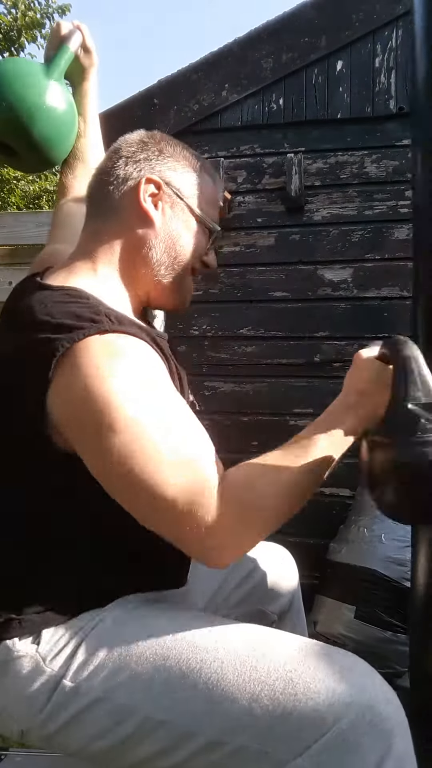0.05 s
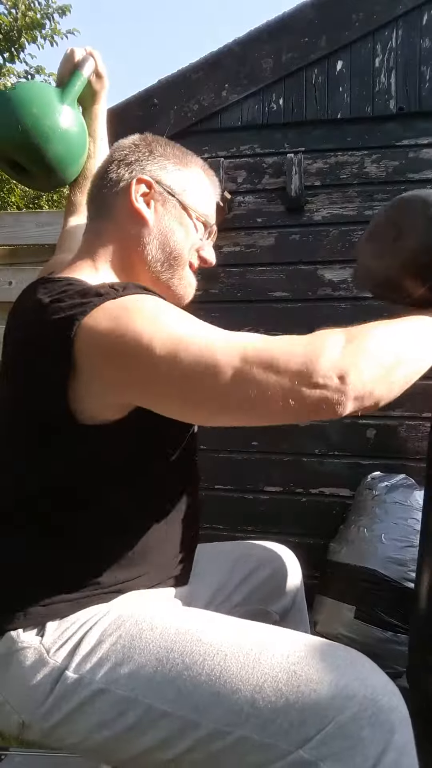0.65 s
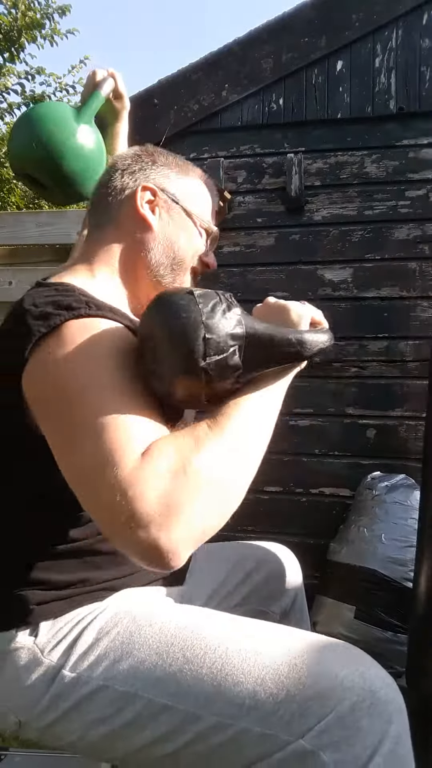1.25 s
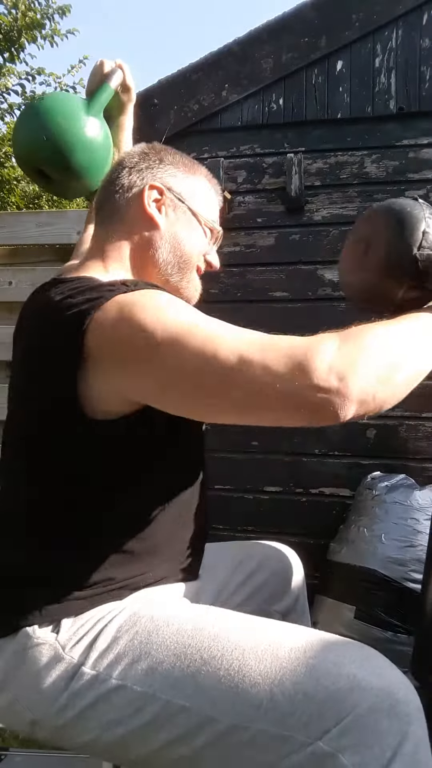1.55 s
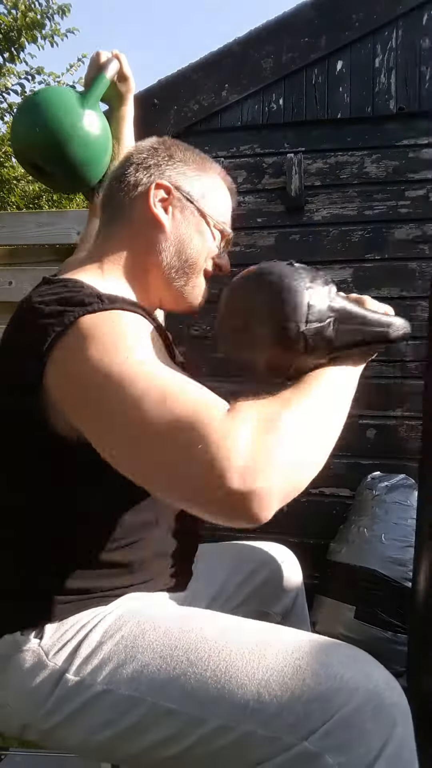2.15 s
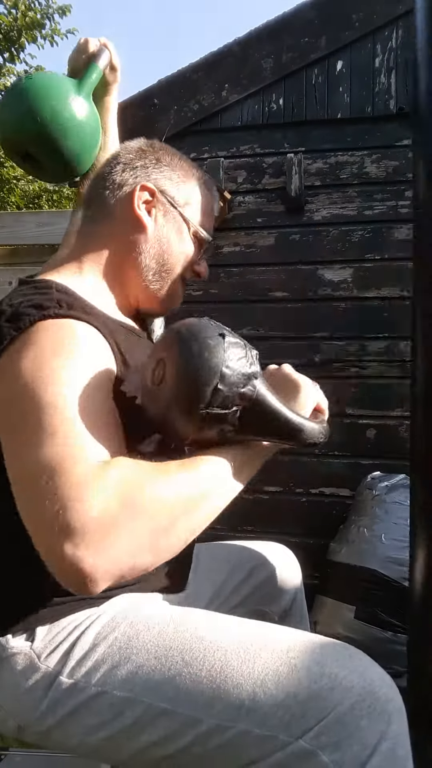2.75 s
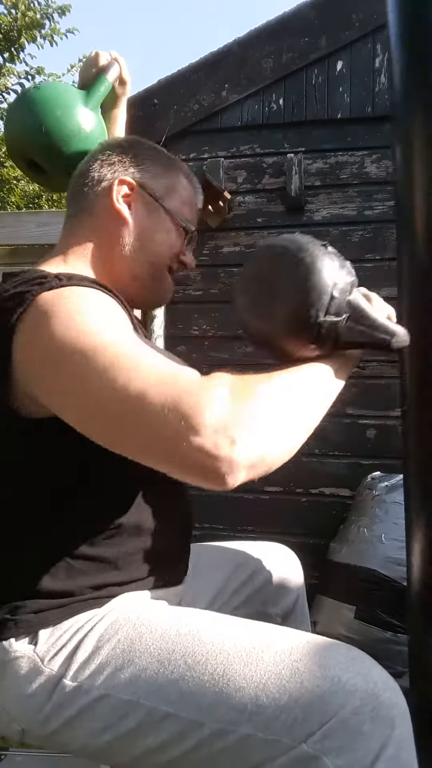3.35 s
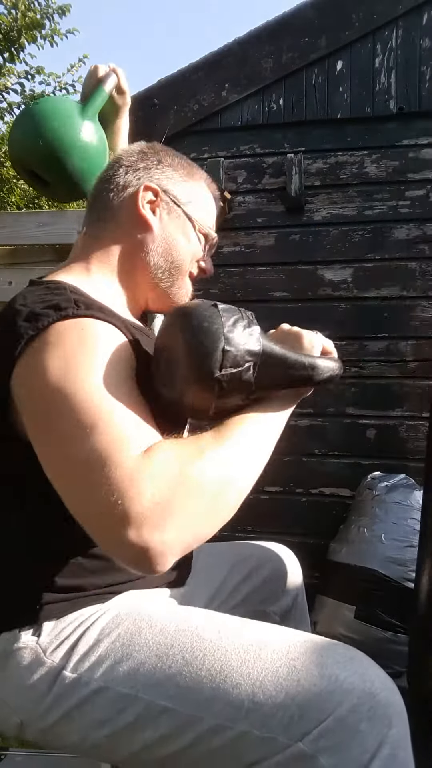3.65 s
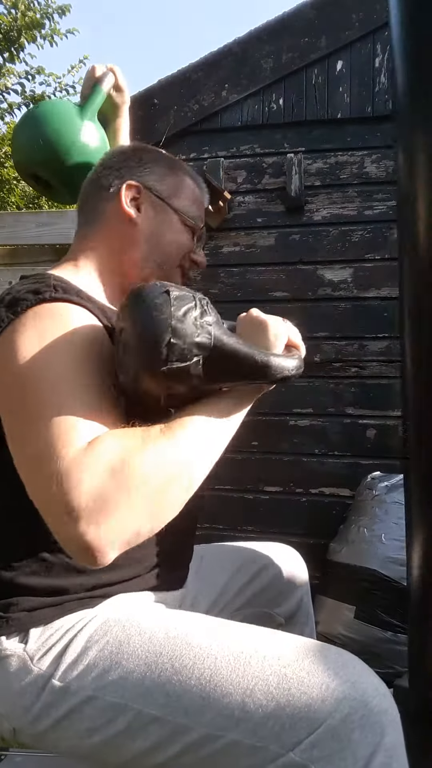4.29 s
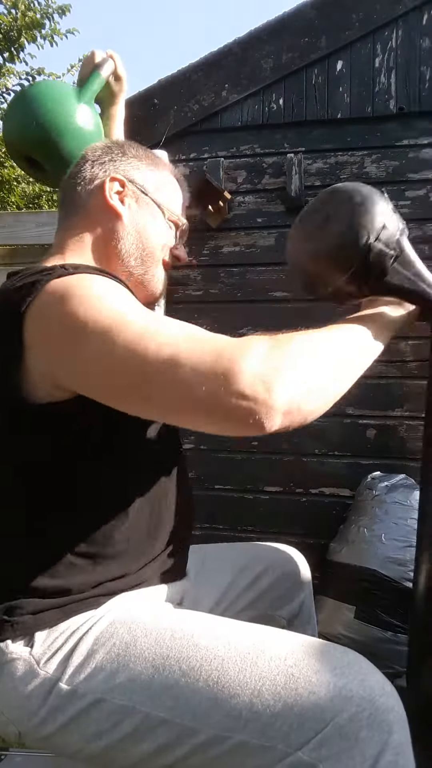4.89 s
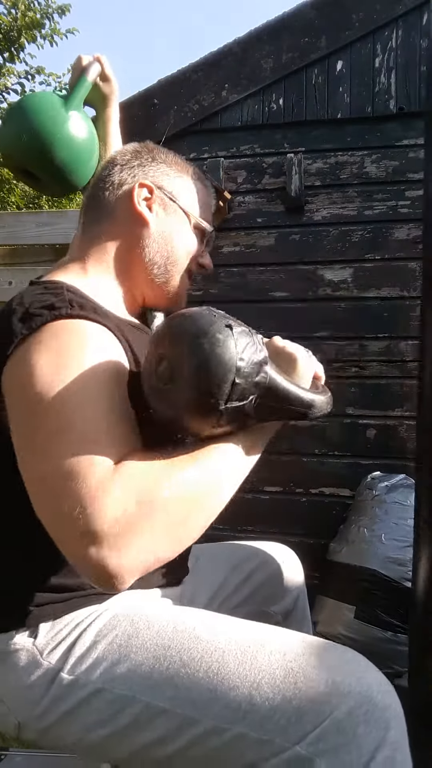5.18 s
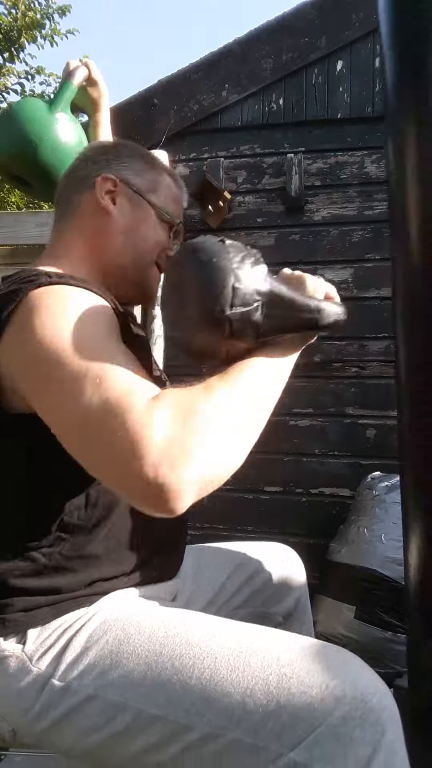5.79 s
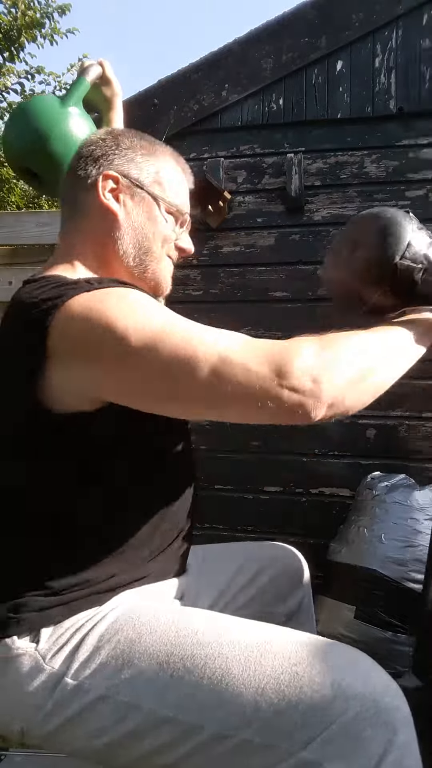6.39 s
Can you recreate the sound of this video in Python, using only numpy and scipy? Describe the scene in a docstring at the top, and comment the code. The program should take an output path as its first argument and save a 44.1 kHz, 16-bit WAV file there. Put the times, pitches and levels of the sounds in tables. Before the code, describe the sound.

Outdoors, steady padded punches on a hanging bag set its mount thudding and rumbling in pairs of deep, woody knocks.

```python
"""Outdoors beside a wooden shed, someone punches a hanging bag with a kettlebell in the fist.
Each punch lands with a soft slap and drives the bag out until its mount thuds; the bag swings back,
thuds again and bounces. A thud is a crack, ringing modes, a chattering joint and shuddering wood.
The mount rumbles as it sways, the cover rubs and creases, and the filling trickles.
Behind it all lies a quiet garden with a few far birds and a faint electrical tick."""
import sys
import numpy as np
from scipy import signal
from scipy.fft import rfft, irfft, next_fast_len
from scipy.io import wavfile
from scipy.ndimage import map_coordinates

SR = 44100
rng = np.random.default_rng(int(sys.argv[2]) if len(sys.argv) > 2 else 0)


def store_pcm(level_fs):
    """Save levels as 16-bit WAV."""
    pcm = np.round(np.clip(level_fs, -1, 1) * 32767).astype(np.int16)
    wavfile.write(sys.argv[1], SR, np.atleast_2d(pcm).T)


N = 287973

# Cue sheets; each layer adds its own trim to these levels.
# The bag ends its outward swing, or falls back: t/s, thump/dB, boom/dB, knock/dB, crack/dB, sway/dB,
# rustle/dB
PUSHES = [(0.7473, 0, -4.5, -5.2, -59.5, -5, -2), (1.6024, 0.4, -3, 0, -35, -1, 0),
          (2.425, 3, 1, 1.5, -27.5, 1.5, 2), (3.213, 3.5, 3, 2, -29, 1.5, 3.5),
          (3.9953, -1, 5, -5.5, -31, -6.5, -1), (4.8187, -2, -2.5, -4, -35, -3.5, -1),
          (5.6092, 4.5, 1.5, 0.5, -41, -1, -2), (6.4336, -1, -1.5, 2, -37.5, -1.5, 0.5)]
RETURNS = [(0.0794, -1.2, 0.8, 0.5, -28, -4, -4.5), (0.915, -4, 10, -2.3, -26, 1.5, -0.5),
           (1.781, 0.5, 9, 1.5, -29, 7, -0.5), (2.581, -2, 7.5, 1.5, -25, 5.5, 0.5),
           (3.359, 1.5, 1, 1.5, -26.5, 3, 1), (4.144, 1.5, -3.5, -1, -33, -5.5, 0.5),
           (4.9849, -0.9, 8.5, 1, -27, 2.5, 0), (5.739, -2.3, -6, -1.5, -39, -5.5, -1)]
# the mount bounces after a return: t/s, thump/dB, boom/dB, knock/dB, crack/dB
BOUNCES = [(.120, -6.5, -20, -32, -51), (.135, -7, -24, -33, -57), (.972, -7, 1, -2, -43),
           (1.842, 2.5, -1, -5.5, -56), (1.99, -9, -17, -32, -57), (2.644, -3, 0, -4, -39),
           (2.782, -10, -20.5, -23, -58), (3.418, -23, -3.5, -6.5, -54), (4.197, -10, -20, -11, -49.5),
           (4.305, -14, -20.5, -22, -53), (5.048, -3.5, 1.5, -2, -36), (5.788, -8, -35, -32, -52.5)]
# the push that has the bag already swinging as the scene opens: t/s, sway/dB
OPENING_PUSH = (-0.087, 1)
# far bird whistles: t/s, length/s, f/Hz, level/dB
BIRDS = [(3.79, 0.18, 1880, -61), (4.36, 0.14, 5170, -72), (4.59, .06, 5180, -79), (4.68, .07, 5130, -80)]
# the sharpest creases in the cover: t/s, level/dB, fizz/dB
CREASES = [(0.02, -42, -65), (0.05, -45, -63), (0.4228, -52.5, -54), (1.2541, -44.5, -81.5),
           (1.497, -45.5, -67.5), (1.9027, -52, -50.5), (2.6604, -40, -42), (3.1682, -40, -46.5),
           (3.3553, -38.5, -44), (3.5447, -43, -65), (3.5862, -41, -72), (3.6375, -42.5, -62),
           (3.7252, -43, -56), (4.2425, -38.5, -57), (5.8649, -37.5, -57.5)]
# the hanger scuffs as it takes up its slack before a punch, or on a backswing: t/s, level/dB
SCUFFS = [(0.601, -35), (1.383, -33.5), (1.427, -31.5), (2.285, -28.5), (3.087, -31), (3.875, -31.5),
          (4.67, -33), (5.425, -36), (5.495, -32), (6.005, -35.5), (6.197, -43.5), (6.266, -33.5)]
# the fist meets the bag: t/s, level/dB, snap/dB, follow-through/dB relative to the level
SLAPS = [(0.654, -30, -59.5, -3.5), (1.508, -28.5, -58, 1), (2.325, -26.5, -47.5, -0.5),
         (3.115, -19.5, -47.5, -17), (3.904, -26.5, -61, -3.5), (4.728, -28.5, -54.5, 0),
         (5.51, -26, -46.5, 0), (6.336, -28, -57, -6)]
# the iron slides over the cover: t/s, level/dB
SCRAPES = [(3.433, -39.5), (4.205, -41.5), (5.825, -37)]

# the mount's modes: f/Hz, t60/s, level on a push/dB, level on a return/dB
MOUNT_MODES = [(72.8, 0.15, -15, -18), (98, 0.13, -12.5, -7), (147.8, 0.078, -10, -10),
               (187, 0.22, -25.5, -27.5), (202, 0.12, -20, -20), (237.4, 0.2, -20, -18),
               (295.5, 0.14, -18, -14.5), (341.5, 0.19, -25.5, -18.5), (360.3, 0.14, -27, -25.5),
               (449.6, 0.03, -9, -10), (524.2, 0.17, -24, -24), (565.5, 0.044, -12.5, -15.5),
               (687, 0.08, -26, -26.5), (795, 0.037, -19, -21.5), (856, 0.084, -22.5, -24),
               (925.3, 0.059, -20.5, -23.5), (1046, 0.058, -53, -32.5), (1130, 0.085, -34.5, -29),
               (1524, 0.042, -37, -57.5), (1582, 0.037, -32.5, -34.5), (1820, 0.022, -32, -43),
               (2080, 0.046, -35, -41)]
# decay of the woodwork's after-ring: f/Hz, t60/s
SHUDDER_T60 = [(80, 0.76), (300, 0.5), (600, 0.22), (1500, 0.23), (5000, 0.18)]

# EQ curves: f/Hz, level/dB
GARDEN_EQ = [(15, -37), (35, -19), (80, -2.5), (160, -9), (240, 0), (550, -7.5), (1250, -17.5),
             (2000, -21.5), (3100, -27.5), (4000, -23.5), (5600, -36), (6400, -32.5), (9000, -39.5),
             (15800, -37.5)]  # soft, dark outdoor air
RUMBLE_EQ = [(20, -41), (45, -12.5), (85, 4), (130, -1), (200, -3), (310, -11), (420, -11), (800, -20),
             (1300, -39), (2000, -40), (4000, -69.5)]  # bass of the swaying mount
COVER_EQ = [(400, -5), (1000, 6), (1800, 2), (2600, 2), (4200, 0.5), (5500, -7.5), (8000, -14),
            (12000, -18)]  # midrange rub
FILLING_EQ = [(4000, -34.5), (8000, -27.5), (11000, -20), (13000, -13), (14300, -6), (15800, -4.5)]  # fizz at the very top
CREASE_EQ = [(600, -3), (1500, 14), (3000, 6), (4800, 1), (6500, -11.5), (9000, -13), (15000, -22)]  # papery click
CRACK_EQ = [(600, -29.5), (1100, -11.5), (1350, 1.5), (1620, 13), (1820, 13.5), (2050, 6.5), (2600, -4),
            (3800, -4.5), (5000, -24.5), (7000, -36.5), (11000, -36), (15000, -20)]  # hard front edge of a thud
CHATTER_EQ = [(200, -22.5), (400, -7.5), (650, 4), (900, -1.5), (1150, -5.5), (1350, -15.5), (1650, -9),
              (2050, -28), (2600, -25.5), (4000, -29.5), (6000, -52)]  # woody knock of the joint
SHUDDER_EQ = [(20, -42.5), (50, -11.5), (88, 3.5), (140, -4.5), (200, 0.5), (300, -3), (400, -6),
              (800, -15.5), (1300, -26.5), (2000, -31.5), (4000, -43), (8000, -68.5)]  # low body of the woodwork
SNAP_EQ = [(800, -20), (1600, -2), (3000, 7), (4800, 3), (6500, -7.5), (9000, -17), (15000, -4)]  # bright snap of the cover
SCUFF_EQ = [(60, -3), (250, 10.5), (500, 6.5), (850, 1.5), (1300, -19), (2000, -19), (3500, -34),
            (8000, -57)]  # muffled hanger
SLAP_EQ = [(40, -19.5), (90, 0.5), (300, 2.5), (750, -8.5), (1200, -20.5), (1800, -22), (2600, -37),
           (5000, -41.5), (9000, -67)]  # dull, padded hit
SCRAPE_EQ = [(1000, -13), (1700, -5.5), (3200, 2.5), (5000, 0.5), (6200, -14), (10000, -24), (15000, -18.5)]  # raspy iron on the cover
TICK_EQ = [(1000, -14.5), (4000, 14), (6500, -7), (9000, -18), (15000, -30)]  # thin electrical click


def amp(db):
    return 10 ** (np.asarray(db) / 20)


def along(points, hz):
    """Read a curve of f/Hz, value points on a log frequency axis."""
    f, values = np.transpose(points)
    return np.interp(np.log(hz + 1), np.log(f + 1), values)


def colour(x, eq):
    """Run x through an EQ curve and bring it to rms 1."""
    gain = amp(along(eq, np.fft.rfftfreq(len(x), 1 / SR)))
    shaped = irfft(rfft(x) * gain, len(x))
    return shaped / np.sqrt(np.mean(shaped ** 2) + 1e-20)


def noise(eq, size):
    return colour(rng.standard_normal(size), eq)


def wobble(rate, size=N):
    """A smooth random curve with rate knots a second."""
    knots = rng.standard_normal(int(size * rate / SR) + 4)
    return map_coordinates(knots, [np.arange(size) * rate / SR])


def add(track, s, sound):
    """Mix a sound into the track from time s on."""
    start = max(round(s * SR), 0)
    track[start:start + len(sound)] += sound[:max(N - start, 0)]


def burst(eq, rise, t60):
    """A puff of noise that swells and dies; rise and t60 are in seconds."""
    t = np.arange(SR // 2) / SR
    return noise(eq, len(t)) * (1 - np.exp(-t / rise)) * amp(-60 * t / t60)


def swell(cues, delay, rise, fall):
    """An envelope that peaks delay seconds after each t/s, level/dB cue; rise and fall are in dB/s."""
    t = np.arange(N) / SR
    power = np.zeros(N)
    for s, db in cues:
        since = t - s - delay
        drop_db = np.maximum(-rise * since, fall * since).clip(0, 150)
        power += amp(db - drop_db) ** 2
    return np.sqrt(power)


def grains(eq, spread_db):
    """Dense tiny contacts of uneven size, at rms 1."""
    return colour(rng.standard_normal(N) * amp(spread_db * wobble(700)), eq)


def garden():
    """A bed of still outdoor air, its level barely drifting."""
    return amp(-57 + wobble(5.9)) * noise(GARDEN_EQ, N)


def sway():
    """The mount rumbles as the bag recoils from each push, and dies down slowly after each return."""
    pushed = [(s, db) for s, *_, db, _ in PUSHES] + [OPENING_PUSH]
    returned = [(s, db) for s, *_, db, _ in RETURNS]
    recoil = amp(-39) * swell(pushed, delay=0.1, rise=327.5, fall=137)
    dying = amp(-35.5) * swell(returned, delay=0.027, rise=298, fall=56.5)
    return np.hypot(recoil, dying) * amp(3.2 * wobble(30)) * noise(RUMBLE_EQ, N)


def rustle():
    """The cover rubs and the filling trickles as the bag is squeezed, jolted or slumps into shape."""
    pushed = [(s, db) for s, *_, db in PUSHES]
    returned = [(s, db) for s, *_, db in RETURNS]
    rub = [amp(-58) * swell(pushed, delay=-0.034, rise=201, fall=69),  # squeezed by the fist
           amp(-56) * swell(returned, delay=0.054, rise=150.5, fall=39.5)]  # relaxing
    trickle = [amp(-56.5) * swell(pushed, delay=-0.048, rise=259.5, fall=93),  # squeezed
               amp(-56.5) * swell(pushed, delay=0.055, rise=244, fall=230),  # thrown forward
               amp(-47) * swell(returned, delay=0.011, rise=419, fall=374.5),  # jolted
               amp(-49.5) * swell(returned, delay=0.075, rise=299.5, fall=116),  # slumping
               amp(-65.5) * swell(returned, delay=0.38, rise=31, fall=51)]  # last grains
    cover = np.linalg.norm(rub, axis=0) * amp(1.3 * wobble(40)) * grains(COVER_EQ, spread_db=5)
    filling = np.linalg.norm(trickle, axis=0) * amp(2.8 * wobble(40)) * grains(FILLING_EQ, spread_db=3.5)
    return cover + filling


def creases():
    """Creases snap with a click and a fizz; three weak ones let go as the cover relaxes from a return."""
    out = np.zeros(N)
    weak = [(s + delay, rng.normal(-56, 2), rng.normal(-69, 2))
            for s, *_ in RETURNS for delay in rng.uniform(0.12, 0.29, size=3)]
    for s, db, fizz_db in list(CREASES) + weak:
        add(out, s, amp(db + 1) * burst(CREASE_EQ, rise=0.00095, t60=0.02))
        add(out, s, amp(fizz_db + 9.5) * burst(FILLING_EQ, rise=0.0004, t60=0.034))
    return out


def ticking():
    """A faint, even electrical tick, about ten a second."""
    out = np.zeros(N)
    for s in np.arange(0.054, N / SR, 0.10238):
        add(out, s, amp(-52) * burst(TICK_EQ, rise=0.00033, t60=0.0048))
    return out


def ring(mode_db, thump_db, boom_db, knock_db):
    """One blow on the mount; where and how hard it lands weights the low, middle and high modes."""
    travel_s, rise_cycles, detune = 0.00086, 0.68, 0.025
    hz, t60 = np.transpose(MOUNT_MODES)[:2, :, None]
    weight_db = along([(200, thump_db), (245, boom_db), (335, boom_db), (420, knock_db)], hz)
    looseness = np.minimum(hz / 800, 1) ** 2  # the high modes vary most from blow to blow
    pitch_jitter, level_jitter = looseness * rng.standard_normal((2, len(hz), 1))
    # bending waves travel faster at high pitch, so the knock arrives just ahead of the thump
    t = np.maximum(np.arange(SR // 2) / SR - travel_s * np.sqrt(1000 / hz), 0)
    cycles = hz * (1 + detune * pitch_jitter) * t
    attack = 1 - np.exp(-(cycles / rise_cycles) ** 2)
    decay = amp(mode_db[:, None] + weight_db + 2 * level_jitter - 60 * t / t60)
    polarity = (-1) ** np.arange(len(hz))[:, None]
    return np.sum(polarity * np.sin(2 * np.pi * cycles) * attack * decay, axis=0)


def chatter(gap, t60):
    """The loose joint strikes again and again, ever more weakly, as the load comes on."""
    t = np.arange(SR // 4) / SR
    contacts = np.cumsum(gap * rng.uniform(0.5, 1.5, size=12))
    since = t[:, None] - np.append(0, contacts)
    envelope = np.sum((since >= 0) * np.exp(-np.abs(since) / 0.0032), axis=1) * amp(-60 * t / t60)
    clatter = np.pad(envelope * rng.standard_normal(len(t)), (64, 0))
    return colour(clatter, CHATTER_EQ) * np.sqrt(np.mean(envelope ** 2))  # the wood dulls every contact


def shudder(rise):
    """The dense after-ring of the woodwork: it comes in small lumps, and the bass lasts longest."""
    hz, t, spectrum = signal.stft(noise(SHUDDER_EQ, SR), SR, nperseg=512)
    decay = amp(-60 * t / along(SHUDDER_T60, hz)[:, None])
    _, tail = signal.istft(spectrum * decay, SR, nperseg=512)
    lumps = amp(0.42 * wobble(43.2, size=len(tail)))
    attack = 1 - np.exp(-np.arange(len(tail)) / SR / rise)
    return tail * lumps * attack


def thuds(blows, mode_db, ring_db, crack_db, chatter_db, shudder_db):
    """Each thud stacks the mount's modes, a short crack, a chattering joint and a shudder."""
    out = np.zeros(N)
    for s, thump_db, boom_db, knock_db, edge_db, *_ in blows:
        add(out, s, amp(ring_db) * ring(mode_db, thump_db, boom_db, knock_db))
        add(out, s + 0.001005, amp(crack_db + edge_db) * burst(CRACK_EQ, rise=0.0022, t60=0.047))
        add(out, s + 0.001991, amp(chatter_db + knock_db) * chatter(gap=0.006, t60=0.088))
        add(out, s + 0.004, amp(shudder_db + (thump_db + boom_db) / 2) * shudder(rise=0.0019))
    return out


def mount():
    """The bag loads its mount at both ends of the swing, then bounces and settles."""
    _, _, push_db, return_db = np.transpose(MOUNT_MODES)
    out = thuds(PUSHES, push_db, ring_db=-3, crack_db=1.4, chatter_db=-21.5, shudder_db=-29)
    out += thuds(RETURNS, return_db, ring_db=-0.16, crack_db=1, chatter_db=-24, shudder_db=-21)
    rebounds = list(BOUNCES) + settling()
    out += thuds(rebounds, return_db, ring_db=-4.5, crack_db=-3.5, chatter_db=-25, shudder_db=-28.5)
    for s, *_, crack_db, _, _ in RETURNS:  # a return also snaps the cover taut
        add(out, s + 0.0038, amp(crack_db - 12) * burst(SNAP_EQ, rise=0.00065, t60=0.021))
    return out


def settling():
    """Cues for two ever weaker knocks after each return, as the mount rocks to rest."""
    return [(s + rng.normal(delay, 0.006), *np.add(levels, trim_db))
            for s, *levels in RETURNS for delay, trim_db in [(0.12, -24.5), (0.192, -29.5)]]


def hanger():
    """The hanger scuffs softly as it takes up its slack before a punch, and again on the backswing."""
    out = np.zeros(N)
    for s, db in SCUFFS:
        add(out, s, amp(db - 5.5) * burst(SCUFF_EQ, rise=0.0013, t60=0.13))
    for s, *_ in RETURNS:
        add(out, s + 0.255, amp(-45) * burst(SCUFF_EQ, rise=0.013, t60=0.4))
    return out


def slap(db, snap_db):
    """A hard first contact with a snap, then the padding gives way."""
    contact = amp(db + 5.5) * burst(SLAP_EQ, rise=0.0011, t60=0.037)
    padding = amp(db - 8.5) * burst(SLAP_EQ, rise=0.005, t60=0.23)
    snap = amp(snap_db + 4) * burst(SNAP_EQ, rise=0.00057, t60=0.027)
    return contact + padding + snap


def punches():
    """The fist lands, and the kettlebell follows just behind with a second slap and a small crack."""
    follow_s = 0.017
    out = np.zeros(N)
    for s, db, snap_db, follow_db in SLAPS:
        add(out, s + 0.0015, slap(db, snap_db))
        add(out, s + 0.0015 + follow_s, slap(db + follow_db, snap_db=-61.5))
        add(out, s + follow_s, amp(-48.5 + follow_db / 2) * burst(CRACK_EQ, rise=0.001, t60=0.05))
    return out


def grind():
    """Driven outward, the bag grinds ever harder until the mount stops it."""
    out = np.zeros(N)
    ramp_db = np.linspace(0, 5.6, round(0.076 * SR))
    fades = signal.windows.tukey(len(ramp_db), 0.2)
    for s, *_, sway_db, _ in PUSHES:
        add(out, s - 0.068, amp(-34.5 + sway_db + ramp_db) * noise(RUMBLE_EQ, len(ramp_db)) * fades)
    return out


def scrapes():
    """The iron slides over the cover with a short rasp."""
    out = np.zeros(N)
    for s, db in SCRAPES:
        add(out, s, amp(db) * burst(SCRAPE_EQ, rise=0.02, t60=0.1))
    return out


def birds():
    """Far birds whistle thin, pure notes that fade in and out."""
    out = np.zeros(N)
    for s, length, hz, db in BIRDS:
        t = np.arange(round(length * SR)) / SR
        add(out, s, amp(db) * np.hanning(len(t)) * np.sin(2 * np.pi * hz * t))
    return out


def scene():
    """The bag and its rig up front, the garden behind, in mono."""
    rig = sway() + mount() + hanger()
    bag = rustle() + creases() + punches() + grind() + scrapes()
    background = garden() + ticking() + birds()
    return (rig + bag + background)[None]


def record(dry):
    """The microphone rounds off the loudest peaks and keeps nothing above its band limit."""
    ceiling, top_hz = 0.95, 15900
    rounded = dry / (1 + np.abs(dry / ceiling) ** 8) ** (1 / 8)
    size = next_fast_len(N + SR // 2)
    passband = np.fft.rfftfreq(size, 1 / SR) < top_hz
    return irfft(rfft(rounded, size) * passband, size)[..., :N]


dry = scene()
out = record(dry)
store_pcm(out)
```